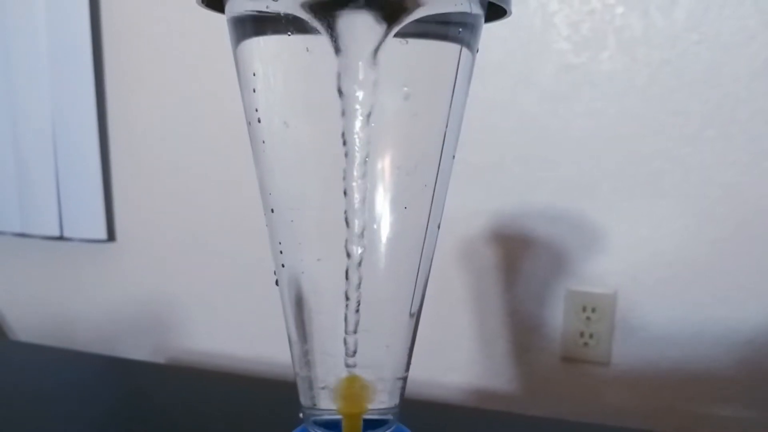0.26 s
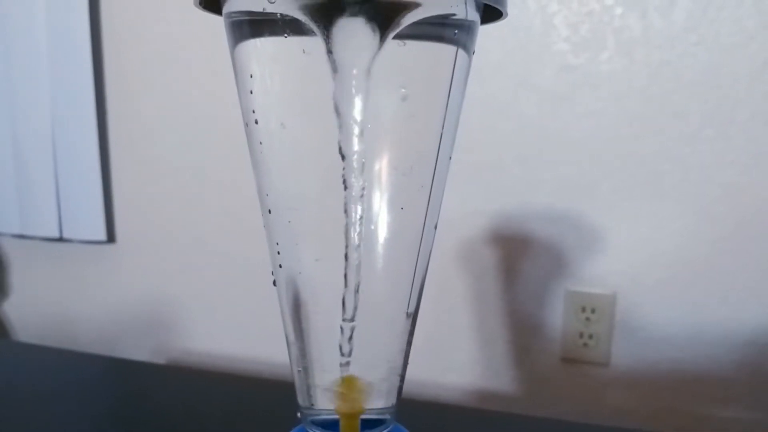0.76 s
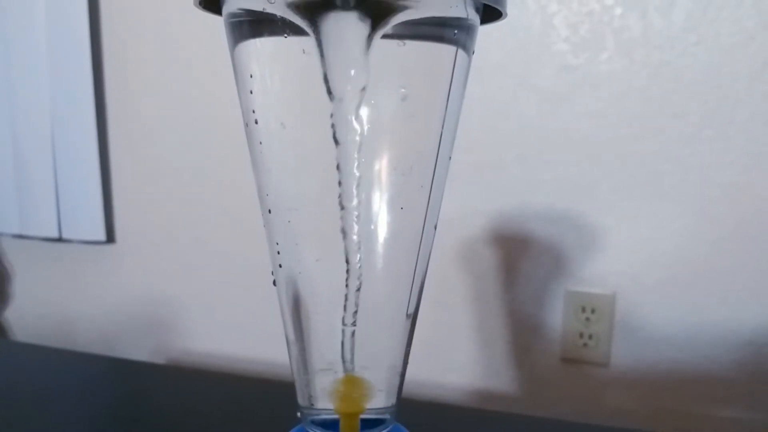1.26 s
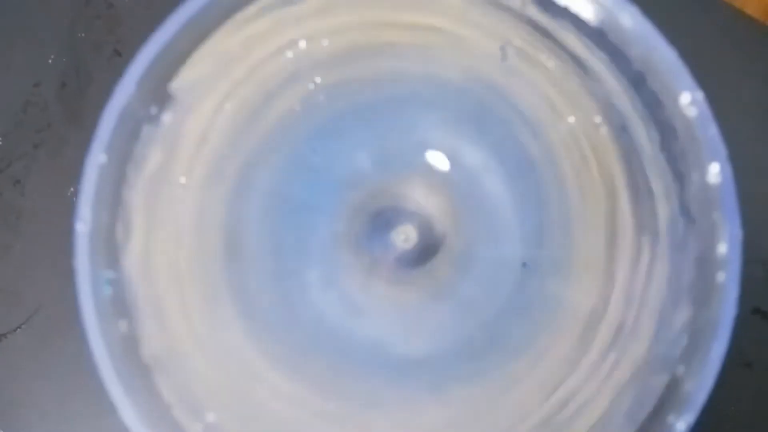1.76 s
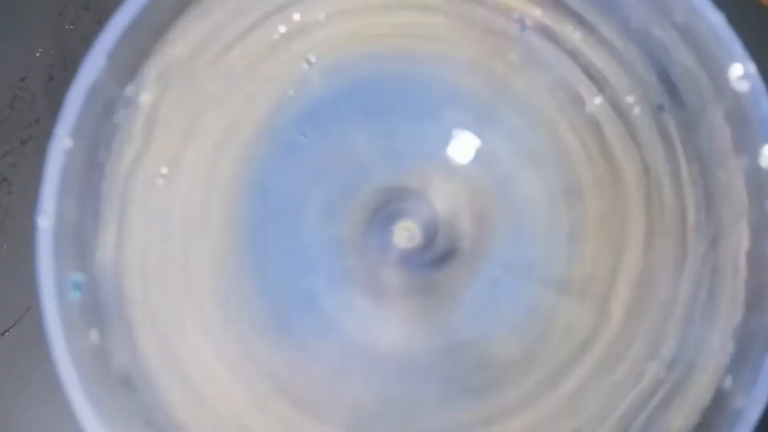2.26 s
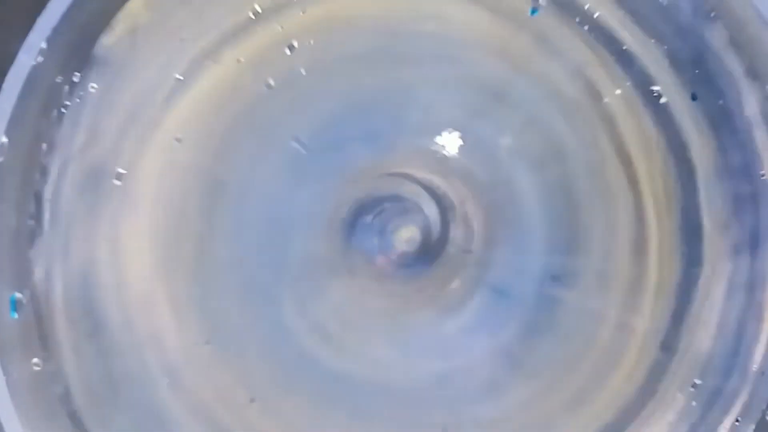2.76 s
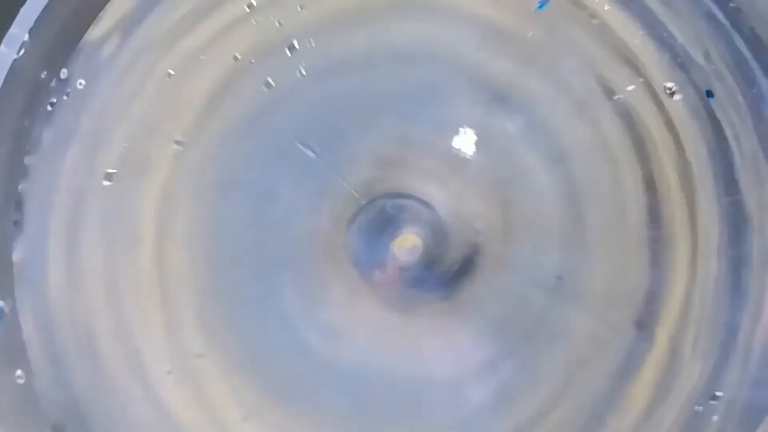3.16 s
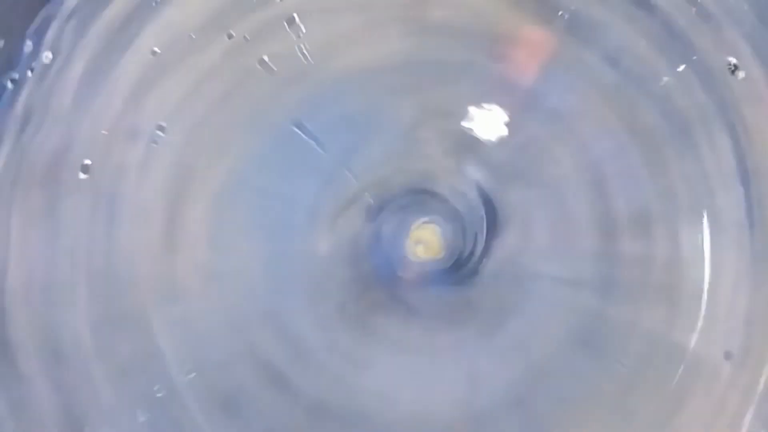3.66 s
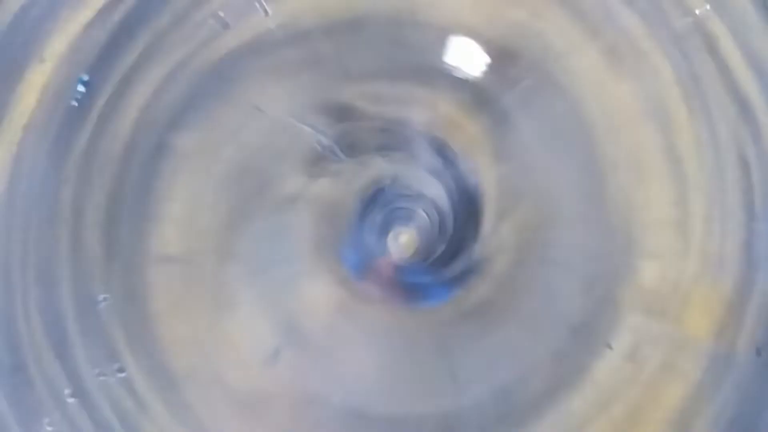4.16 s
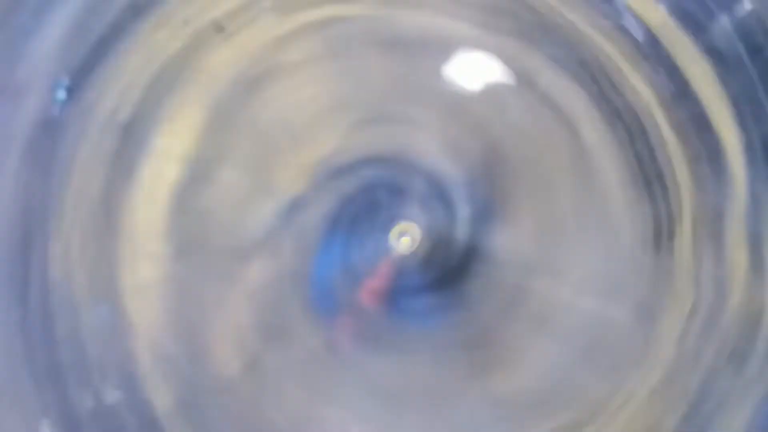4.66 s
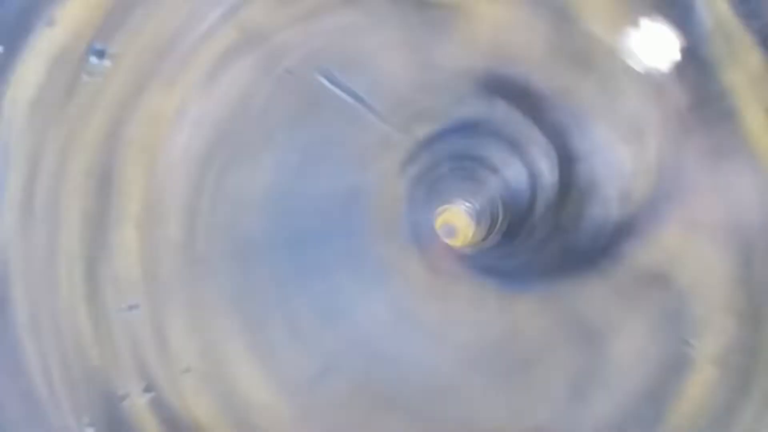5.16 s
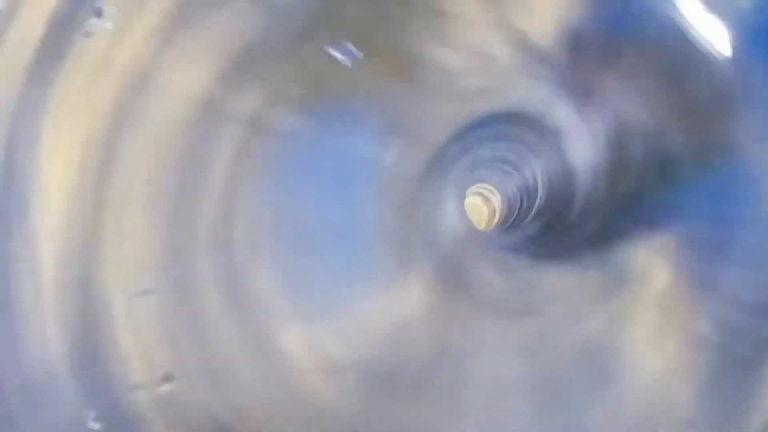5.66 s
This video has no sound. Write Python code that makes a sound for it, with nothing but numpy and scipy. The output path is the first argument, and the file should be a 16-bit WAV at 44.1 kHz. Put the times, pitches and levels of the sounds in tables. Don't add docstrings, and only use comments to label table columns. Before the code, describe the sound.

A motor-stirred vortex hisses and bubbles, muffled from the side, then abruptly close and crackly from above, ending in wet pops and glugs.

```python
import sys
import numpy as np
from scipy import signal
from scipy.fft import rfft, irfft
from scipy.io import wavfile
from scipy.ndimage import uniform_filter1d

SR = 44100
rng = np.random.default_rng(int(sys.argv[2]) if len(sys.argv) > 2 else 0)


def voltage_ratio(decibels):
    exponent = np.asarray(decibels, float) / 20
    return 10 ** exponent


def store_pcm(level_fs):
    pcm = np.round(np.clip(level_fs, -1, 1) * 32767).astype(np.int16)
    wavfile.write(sys.argv[1], SR, np.atleast_2d(pcm).T)


N = 261072
TIME = np.arange(N) / SR
SHAFT_HZ = 44.3


def unit(x):
    return x / np.sqrt(np.mean(x ** 2) + 1e-30)


def band(x, lo_hz, hi_hz, order=4):
    return signal.sosfilt(signal.butter(order, [lo_hz, min(hi_hz, .45 * SR)], "band", fs=SR, output="sos"), x)


def ring(x, hz, width_hz):
    return signal.lfilter(*signal.iirpeak(hz, hz / width_hz, SR), x)


def walk(rate):
    k = int(SR / rate)
    held = np.repeat(rng.standard_normal(N // k + 1), k)
    return 1.91 * uniform_filter1d(uniform_filter1d(held, k), k)[:N]


def stir():
    # time in seconds, churn in dB, froth in dB.
    stirring = [(0.19, -1.5, 0.5), (0.27, 3, 3), (0.438, 2.5, 1.5), (0.6, -0.5, -2), (1.36, 1.5, -4),
                (1.43, 4, -5), (1.75, 1.5, -4.5), (2.02, -3, 8.5), (2.21, -1, 5), (2.58, -3.5, 5.5),
                (3.3, 0, -1.5), (3.44, 2.5, 2), (3.75, -1.5, 0), (4.42, -0.5, -4), (4.57, -0.5, 5),
                (4.98, -1.5, -7), (5.78, 3.5, -3.5), (5.92, 5, 8)]
    s, churn_db, froth_db = np.transpose(stirring)
    return np.interp(TIME, s, churn_db), np.interp(TIME, s, froth_db)


def room():
    # frequency in Hz, level in dB per Hz.
    spectrum = [(15, -49), (25, -12), (82, 0.5), (129, 3.5), (176, 3.5), (216, -10), (285, -7), (615, -30),
                (743, -17), (945, 1.5), (1310, -27), (1500, 6.5), (1950, -18), (3300, -120)]
    hz, db = np.transpose(spectrum)
    freqs = np.maximum(np.arange(N // 2 + 1) * SR / N, 1)
    shape = voltage_ratio(np.interp(np.log(freqs), np.log(hz), db))
    rumble = irfft(rfft(rng.standard_normal(N)) * shape, N)
    slosh = band(rng.standard_normal(N), 243, 770, order=2) * voltage_ratio(1.3 * walk(20.0))
    churn_db, froth_db = stir()
    slosh_db = -77.5 + 2.1 * churn_db + 0.43 * froth_db
    return voltage_ratio(-66.5 + 2.2 * walk(4.97)) * unit(rumble) + voltage_ratio(slosh_db) * unit(slosh)


def motor():
    # time in seconds, level of the fifth order in dB.
    load = [(0.0, -82.5), (1.71, -73.5), (1.76, -78), (2.31, -64), (2.47, -77.5), (2.59, -63), (2.8, -72.5),
            (3.38, -59.5), (4.04, -72), (4.12, -59), (4.47, -85.5), (4.53, -68.5), (5.06, -74), (5.14, -66),
            (5.23, -75), (5.89, -59), (5.92, -76)]
    # multiple of the shaft speed, level in dB.
    orders = [(3, -74), (4, -88), (7.5, -86), (8, -91)]
    turn = 2 * np.pi * np.cumsum(SHAFT_HZ * (1 + 0.0054 * walk(12))) / SR
    hum = sum(voltage_ratio(db + 2.0 * walk(4.89)) * np.sin(k * turn) for k, db in orders)
    fifth = np.sin(5 * turn)
    hollow = voltage_ratio(-1.0) * unit(ring(rng.standard_normal(N), 211.3, 18.0))
    load_db = np.interp(TIME, *np.transpose(load))
    return np.sqrt(2) * hum + voltage_ratio(load_db + 1.0) * (np.sqrt(2) * fifth + hollow)


def bumps():
    # start in seconds, peak in dB, frequency in Hz, width in Hz.
    pushes = [
        (2.985, -55.5, 447, 14),
        (4.015, -39, 500, 690),
        (4.3589, -35, 1720, 56),
        (4.636, -41, 497, 740),
        (5.6, -26, 2300, 60),
        (5.6895, -37, 2050, 200),
    ]
    out = 0
    for s, db, hz, width_hz in pushes:
        rung = ring(1. * (np.arange(N) == int(s * SR)), hz, width_hz)
        out = out + voltage_ratio(db) * rung / rung.max()
    return out


def swells():
    # middle in seconds, half length in seconds, level in dB, low edge in Hz, high edge in Hz.
    slops = [(0.21, .08, -63, 420, 1500), (.41, .14, -59.5, 500, 4100), (0.35, 0.14, -58.5, 7300, 15000),
             (1.5, .24, -75, 10000, 19000), (1.1, 0.074, -67, 560, 3900), (1.47, 0.13, -52.5, 1280, 4000),
             (1.69, .05, -59, 610, 1100), (3.38, .2, -68.5, 640, 1140), (2.15, .12, -69, 350, 1200),
             (5.15, 0.066, -89, 280, 860), (5.3, 0.11, -68, 370, 970), (5.65, 0.38, -69, 11400, 12000),
             (3.29, 0.081, -48.5, 980, 1350)]
    out = np.zeros(N)
    lumps = voltage_ratio(1.45 * walk(40))
    for s, half_s, db, lo_hz, hi_hz in slops:
        near = np.abs(TIME - s) < half_s
        rush = unit(band(rng.standard_normal(size=SR), lo_hz, hi_hz, order=2))[:near.sum()]
        out[near] += voltage_ratio(db) * rush * np.cos(np.pi / 2 * (TIME[near] - s) / half_s)
    return out * lumps


def core():
    # time in seconds, level in dB.
    whistle = [(0, -67.5), (3.3, -68), (3.6, -68), (3.9, -59), (4.3, -60), (4.7, -63), (5.1, -63),
               (5.4, -66.5), (5.92, -61)]
    air = sum(ring(ring(rng.standard_normal(N), hz, 240), hz, 240) for hz in (7300, 7560))
    return voltage_ratio(np.interp(TIME, *np.transpose(whistle)) + 1.0 * walk(10)) * unit(air)


def glugs():
    # start in seconds, length in seconds, peak in dB, first pitch in Hz, last pitch in Hz.
    singing = [
        (5.018, 0.038, -37, 2020, 2300),
        (5.118, 0.014, -49, 3450, 3400),
        (5.392, 0.017, -38, 2380, 2290),
        (6.4, 0.014, -25, 1720, 1790),
    ]
    out = 0
    for s, length_s, db, from_hz, to_hz in singing:
        age = np.clip((TIME - s) / length_s, 0, 1)
        mean_hz = from_hz + (to_hz - from_hz) * age / 2
        out = out + voltage_ratio(db) * np.sin(np.pi * age) * np.sin(2 * np.pi * length_s * age * mean_hz)
    return out * voltage_ratio(3 * walk(250))


def bubbles(span, modes, level_db):
    chance = rng.random((int(260 * (span[1] - span[0])), 5)).T
    mode = np.array([m for m in modes if m[0] < 7000])
    mode = mode[(chance[0] * len(mode)).astype(int)]
    start = ((span[0] + chance[1] * (span[1] - span[0])) * SR).astype(int)
    hz = mode[:, 0] * (1 + 0.22 * (chance[2] - .5))
    churn_db, _ = stir()
    db = level_db + .5 * mode[:, 2] - 4 * np.log(chance[3] + 0.0045) + 1.4 * churn_db[start]
    turns = hz[:, None] * np.arange(512) / SR
    life = turns / (8.2 * (0.27 + 0.74 * chance[4, :, None]))
    tone = np.exp(-3 * life) * np.sin(2 * np.pi * turns * (1 + 0.033 * life))
    out = np.zeros(N + 512)
    np.add.at(out, start[:, None] + np.arange(512), voltage_ratio(db)[:, None] * tone)
    return out[:N]


def strikes():
    blades = np.arange(0, N - 200, SR / (2 * SHAFT_HZ)).astype(int)
    return rng.integers(0, N, size=1500), blades + rng.integers(0, 60, size=len(blades))


def bursts(index, size, t60, crack=0.):
    start = np.zeros(N)
    np.add.at(start, index, size)
    fast, slow = (signal.lfilter([1], [1, -1000 ** (-1 / (t * SR))], start) for t in (t60, 5 * t60))
    noise = rng.uniform(-np.sqrt(3), np.sqrt(3), N)
    return crack * start + (fast + voltage_ratio(-21) * slow) * noise


def fizzing(pops, blades, shared):
    start = np.concatenate([pops, blades])
    size_db = 2.6 * shared + 3.6 * rng.exponential(size=len(start))
    ticks = bursts(start, voltage_ratio(np.minimum(size_db, 20)), t60=0.023, crack=6.1)
    return unit(rng.standard_normal(N) + voltage_ratio(0.5) * unit(ticks))


def pings(knocks):
    turns = knocks[:, 2:3] * np.arange(512) / SR
    tone = np.exp(-turns / 9.3) * np.sin(2 * np.pi * turns)
    out = np.zeros(N + 512)
    start = (knocks[:, :1] * SR).astype(int)
    np.add.at(out, start + np.arange(512), voltage_ratio(knocks[:, 1:2] - 9.5) * tone)
    return out[:N]


def cone(span, knocks, modes, zones, fizzes, crack):
    borders_hz = [2700, 5600, 9700]
    place = np.array([0, 1, 2, 2.92])
    home = np.searchsorted(borders_hz, knocks[:, 2])
    index = (knocks[:, 0] * SR).astype(int)
    spot = voltage_ratio(3.0 * rng.standard_normal(size=(len(knocks), 4, 8)))
    surge, out = walk(21.046), 0
    churn_db, froth_db = stir()
    pops, blades = strikes()
    shared = rng.exponential(size=len(pops) + len(blades))
    for zone, (lo_hz, hi_hz, plain_db, knock_db, t60) in enumerate(zones):
        level_db, per_churn, per_froth, drift = fizzes[zone]
        fizz_db = level_db + per_churn * churn_db + per_froth * froth_db + drift * (TIME - np.mean(span))
        unrest = 0.4 if zone == 3 else 1
        fizz_db = fizz_db + unrest * (1.13 * surge + 0.97 * walk(25))
        away = place[zone] - place[home]
        steps = np.where(away > 0, 2.66 * away, away)
        size = voltage_ratio(knocks[:, 1] - np.abs(knocks[:, 3] * steps) + knock_db)
        inside = [m for m in modes if np.searchsorted(borders_hz, m[0]) == zone] or [(11700, 7200, 0)]
        top_db = max(m[2] for m in inside)
        near = np.exp(-(np.log(knocks[:, 2:3] / np.array(inside)[:, 0]) / .08) ** 2)
        share = spot[:, zone, :len(inside)] * voltage_ratio(16.5 * near)
        if zone < 3:
            share = share / np.sqrt(np.mean(share ** 2, axis=1, keepdims=True))
        fizz = voltage_ratio(plain_db) * fizzing(pops, blades, shared)
        knock = voltage_ratio(plain_db - 6.0) * bursts(index, size, t60, crack=crack)
        probe = voltage_ratio(plain_db) * rng.standard_normal(N)
        for k, (hz, width_hz, db) in enumerate(inside):
            lift = voltage_ratio(db - top_db + 5.0)
            fizz = fizz + lift * voltage_ratio(1.8 * walk(24)) * ring(fizzing(pops, blades, shared), hz, width_hz)
            blow = bursts(index, size * share[:, k], t60, crack=6.93)
            knock = knock + lift * ring(blow, hz, 0.91 * width_hz)
            probe = probe + lift * ring(rng.standard_normal(N), hz, width_hz)
        knock = band(knock, lo_hz, hi_hz) / np.std(band(probe, lo_hz, hi_hz))
        out = out + voltage_ratio(fizz_db) * unit(band(fizz, lo_hz, hi_hz, order=6)) + 1.097 * knock
    return (out + pings(knocks)) * ((TIME >= span[0]) & (TIME < span[1]))


def water_from_side(span):
    # frequency in Hz, width in Hz, level in dB.
    wall_modes = [(836, 70, -7), (1595, 31, -4), (1950, 92, -1), (3350, 240, 3), (4170, 360, 4.5),
                  (5210, 390, 3), (6900, 800, -2), (8940, 86, -25)]
    # low Hz, high Hz, unresonant share in dB, knock in dB, knock t60 in s.
    zones = [(670, 2650, -8, -11.5, 0.029), (2830, 5980, -2.5, 2, 0.025), (5200, 9360, 6, 2, 0.016),
             (9150, 14200, -4, -21, 0.0048)]
    # level in dB, dB per churn dB, dB per froth dB, drift in dB per second.
    fizzes = [(-65, 1.5, 0.19, -1), (-54, 0.9, -0.24, -3), (-58.5, 0.6, 0.2, -0.5), (-70.5, 1, 0.8, 0.5)]
    # start in seconds, level in dB, favoured pitch in Hz, fall in dB per zone away from it.
    knocks = [(0.0054, -45, 5600, 0.5), (0.0134, -53, 5100, 11.5), (0.018, -55, 5340, 0),
              (0.0733, -53, 7140, 0), (0.0835, -48, 6200, 5), (0.129, -42.5, 3400, 1),
              (0.1387, -47, 1510, -1.5), (0.1762, -61, 6520, 10), (0.2527, -45, 4030, 8),
              (0.274, -47, 4150, 8), (0.3144, -35, 3340, 17), (0.3218, -39.5, 7160, 14),
              (0.373, -41.5, 7410, 10), (0.4671, -46, 3180, 7), (0.5122, -34, 8300, 10),
              (0.5183, -55, 6130, 6), (0.525, -62, 5240, 1), (0.5386, -57, 4130, 0),
              (0.564, -47.5, 4180, 7), (0.6732, -50, 5360, 12), (0.686, -47, 3300, 6),
              (0.7184, -43.5, 5140, 14), (0.731, -47.5, 5210, 4), (0.7798, -45, 7950, 0.5),
              (0.808, -42.5, 5350, 5), (0.822, -44, 3940, 3), (0.841, -44.5, 3450, -3),
              (0.8475, -45.5, 4020, -2), (0.9678, -48, 4500, 3.5), (1.0381, -46, 5570, 5),
              (1.1003, -46, 4840, 2), (1.139, -44.5, 4030, 4), (1.1524, -49, 4100, 1),
              (1.194, -46, 4660, 4), (1.2615, -61, 1870, 8), (1.303, -50, 4230, 15), (1.321, -48, 5040, 13),
              (1.3346, -60, 6360, 5), (1.3478, -45, 4070, 1.5), (1.3704, -55, 6590, -1),
              (1.405, -39.5, 1890, 2.5), (1.445, -51, 4220, 5), (1.4945, -44, 4450, 8),
              (1.5062, -42.5, 5240, 13), (1.561, -38.5, 3400, 16), (1.5717, -40, 4150, 15),
              (1.578, -40, 3150, 2), (1.676, -49, 5160, 1), (1.6917, -42, 2930, -1), (1.7, -47, 4120, 4)]
    water = cone(span, np.array(knocks), wall_modes, zones, fizzes, crack=0.86)
    return water + bubbles(span, wall_modes, level_db=-69.5)


def water_from_above(span):
    # frequency in Hz, width in Hz, level in
    # dB.
    cone_modes = [(1180, 112, 0), (1720, 88, 1), (2237, 145, 1), (3368, 224, 2.5), (4220, 256, 1),
                  (6020, 310, 0.5), (6640, 380, -1.5), (8230, 530, -5), (8990, 150, -7.5),
                  (2020, 30, 3), (3760, 150, -5), (4450, 72, -10), (11700, 250, -19), (13700, 500, -22.5)]
    modes = cone_modes
    # low Hz, high Hz, unresonant share in dB, knock in dB, knock t60 in s.
    zones = [(1022, 2390, -3.5, 1.06, 0.015), (2814, 5350, -2, -2, 0.029), (5200, 9530, -2, -4.5, 0.013),
             (9330, 16100, 11.5, -5.5, 0.016)]
    # level in dB, dB per churn dB, dB per froth dB, drift in dB per second.
    fizzes = [(-49.5, 0.97, 0.038, 0.33), (-52, 1.53, 0.029, -1.1), (-60.5, 0.76, 0.36, 0.57),
              (-65, 1.1, 0.66, 0.43)]
    # start in
    # seconds, level in dB, favoured pitch in Hz, fall in dB per zone away from it.
    knocks_above = [(1.7747, -29, 4580, 10), (1.7885, -32, 3020, 8), (1.7981, -50, 3230, 6),
                    (1.8551, -43, 1720, 3), (1.878, -30, 2980, 5.5), (1.8933, -42, 3140, 2.5),
                    (1.9032, -44, 3150, 6), (1.9117, -50, 3170, 1), (1.9639, -36, 5700, 11),
                    (2.0006, -40.5, 8740, 7), (2.0394, -41, 4150, 11), (2.0798, -39, 3220, 2),
                    (2.0844, -50, 6520, 10), (2.0951, -43, 2200, 7), (2.1012, -46, 4180, -1),
                    (2.1168, -35, 8400, 2), (2.1278, -29, 4400, 6), (2.1413, -35, 3060, 1.5),
                    (2.1582, -35.5, 2160, 5), (2.1658, -41, 4240, -4), (2.1733, -37, 1180, 1.5),
                    (2.1912, -36, 14070, 5), (2.2004, -38.5, 4150, 0.5), (2.2547, -34.5, 2120, 3),
                    (2.3088, -45, 5120, -0.5), (2.3333, -32.5, 4550, 13), (2.3697, -33, 8730, 20),
                    (2.391, -50, 8460, 9), (2.4175, -56, 2200, 6), (2.4371, -43, 9100, 6),
                    (2.4674, -50, 14650, 9), (2.5306, -42.5, 2220, 2), (2.5405, -37, 3610, 4),
                    (2.5575, -38.5, 4200, 3), (2.5694, -39, 5200, 3), (2.5798, -40, 1210, -1),
                    (2.5941, -39, 4100, -0.5), (2.6009, -39.5, 1900, 1), (2.7158, -44, 2170, 7),
                    (2.7701, -35.5, 1140, -1.5), (2.7802, -43, 4900, -1), (2.7889, -38, 2240, 2),
                    (2.8007, -34.5, 4480, 2), (2.8064, -34, 2860, 3.5), (2.8642, -44, 8940, 2),
                    (2.8861, -34, 4370, 6), (2.8939, -49, 3760, 5), (2.9249, -42, 3190, 4),
                    (2.9516, -34, 3160, 7), (2.9634, -22, 3760, 9),
                    (2.978, -21.5, 4350, 12), (2.9898, -36, 3100, 1.5), (3.1037, -49, 4610, 10),
                     (3.1363, -38.5, 3260, 9), (3.1677, -35.5, 1970, 12), (3.2147, -48, 3470, 2),
                     (3.2199, -33.5, 3360, 4), (3.2278, -36, 3500, 6), (3.2477, -41, 2200, 1),
                     (3.2668, -46, 6300, 0.5), (3.2824, -33.5, 3240, -1.5), (3.293, -48, 8290, 16),
                     (3.3035, -29, 3280, 1.5), (3.368, -37.5, 1190, 1), (3.38, -40, 1170, 0),
                     (3.4043, -39, 4430, 7), (3.4155, -30.5, 3540, 3.5), (3.4296, -34.5, 3540, 1),
                     (3.4384, -38, 3450, 0), (3.4455, -28, 3550, 11), (3.4527, -36, 3480, -1),
                     (3.461, -37, 3470, 0.5), (3.4721, -32, 3430, 5), (3.4836, -35, 3440, 2),
                     (3.5154, -36.5, 3350, 4.5), (3.6058, -53, 4170, 5), (3.615, -37.5, 8530, 3),
                     (3.6259, -36, 3460, 4), (3.659, -43.5, 1220, 2), (3.686, -46, 3490, 7),
                     (3.7114, -42.5, 2030, 1), (3.763, -38, 4570, 16), (3.7873, -47, 3600, 13),
                     (3.9199, -37, 3630, 5), (3.9488, -45, 4030, 1), (3.9552, -32, 4220, 17),
                     (3.9787, -39.5, 3500, 0.5), (4.0006, -41.5, 2050, 0.5), (4.013, -38, 2080, 2),
                     (4.065, -36, 1590, 1.5), (4.105, -36, 5740, 12), (4.1104, -32.5, 1180, 1),
                     (4.1223, -38, 1740, 0.5), (4.1318, -36.5, 1210, 3), (4.1473, -35.5, 1150, 1),
                     (4.184, -44, 6140, -2), (4.3548, -32, 1890, 3), (4.3846, -35, 2030, 2),
                     (4.41, -44.5, 1720, 0), (4.482, -35.5, 6940, 23),
                    (4.4995, -47, 1700, 6), (4.5351, -36, 1950, 2.5), (4.5951, -37.5, 1760, 2.5),
                    (4.6183, -43, 7080, -1), (4.6334, -34, 1190, 5), (4.6656, -42, 1130, 5),
                    (4.7206, -60, 4100, -3), (4.749, -44, 8200, 8), (4.784, -44.5, 3400, 1),
                    (4.8139, -43, 2020, 1), (4.951, -43, 1700, -2), (4.9808, -38, 1740, 2.5),
                    (5.0052, -33, 3400, 5.5), (5.037, -41.5, 2250, 1.5), (5.0704, -26.5, 2390, 16),
                    (5.0849, -34, 2400, 7), (5.222, -39.5, 3430, 3), (5.248, -39.5, 3500, 5),
                    (5.2594, -39.5, 3300, 4), (5.27, -40, 1720, 2), (5.283, -40.5, 1630, 0),
                    (5.292, -49, 1600, 1), (5.36, -45, 1740, 1), (5.3767, -35.5, 1660, 1),
                    (5.3962, -46, 2230, 1), (5.409, -35.5, 1730, 1), (5.4172, -46, 1710, -7),
                    (5.465, -31, 3280, 2.5), (5.5024, -48, 2300, 7), (5.5491, -24.5, 4220, 3.5),
                    (5.561, -35, 6020, 6), (5.5856, -33, 1720, 2.5), (5.5987, -33.5, 1950, 1),
                    (5.6298, -39, 1570, -1), (5.6346, -35.5, 1700, 1), (5.6525, -39, 1680, 1.5),
                    (5.675, -30.5, 1870, 2.5), (5.6875, -35, 2200, -6), (5.699, -34, 1760, 3),
                    (5.7121, -38, 3300, 1), (5.7452, -38, 2280, 5), (5.796, -43, 3370, 1),
                    (5.8074, -47, 6010, 5), (5.8198, -26.5, 3170, 1.5), (5.8301, -32.5, 2020, 0),
                    (5.845, -23.5, 1800, 6), (5.8534, -32.5, 1980, 1), (5.8642, -38, 2090, -2),
                    (5.9008, -34, 1720, 6), (5.909, -52, 8990, 6)]
    # start in seconds, level in dB, pitch in Hz.
    rim_drops = [(2.1172, -35, 8100), (2.2024, -32, 14000), (2.5794, -41, 6540), (2.78, -33, 5970),
                 (3.2136, -50, 5860), (3.267, -19, 9100), (3.2709, -23.5, 3300), (3.2926, -24, 8850),
                 (3.3798, -41, 7140), (3.483, -42, 6050), (3.6047, -32, 9210), (3.661, -44, 6050),
                 (3.687, -47, 6580), (4.148, -30, 7560), (4.4812, -36, 6350), (4.6343, -33, 7450),
                 (5.3794, -52, 6800), (5.4264, -33, 8400), (5.5612, -28, 6040), (5.6875, -18.5, 8640),
                 (5.745, -31, 6810), (5.7947, -31, 8160), (5.8067, -41, 6140), (5.8645, -37, 6010),
                 (5.9, -31, 6800), (5.9114, -25, 8970)]
    specks = [(3.4385, -37, 13500), (3.484, -36, 13500), (3.687, -47, 13900), (4.3874, -57, 12300),
              (4.4757, -51, 12400), (4.5351, -49, 12800), (4.5511, -44, 15400), (4.578, -39, 14900),
              (4.6179, -43, 13300), (4.6713, -47, 12000), (4.7197, -47, 12100), (5.2754, -50, 11500),
              (5.3787, -48, 11300), (5.5023, -49, 11500), (5.5977, -57, 13400), (5.7503, -41, 12900),
              (5.8072, -37, 11700), (5.8192, -35, 13300), (5.8192, -28, 11700)]
    drops = [(s, db - 10.5, hz, 9) for s, db, hz in rim_drops]
    drops = drops + [(s, db - 3.5, hz, 8) for s, db, hz in specks]
    knocks = np.vstack([knocks_above, drops])
    water = cone(span, knocks, modes, zones, fizzes, crack=6.65)
    return water + bubbles(span, modes, level_db=-61.0)


def two_ports(mid):
    far, late = np.roll(mid, N // 3), np.roll(mid, 37)
    side = voltage_ratio(-14.5) * band(mid, 1450, 2430, order=2)
    side = side - voltage_ratio(-15.0) * band(mid, 9130, 10800, order=2)
    side = side + voltage_ratio(-24.0) * band(mid, 3700, 10300)
    side = side + voltage_ratio(-17) * band(far, 20, 65, order=2)
    side = side + voltage_ratio(-33.5) * band(late, 280, 1160, order=2)
    side = side + voltage_ratio(-16.0) * band(late, 11000, 14600, order=2)
    return np.array([mid + side, mid - side])


def scene():
    # start in seconds, end in seconds.
    views = [
        (0, 1.74),
        (1.74, 5.92),
    ]
    water = water_from_side(views[0]) + water_from_above(views[1])
    mid = water + core() + motor() + room() + bumps() + swells() + glugs()
    fade_s, fade_half_s, fade_db = 1.745, 0.021, -22
    mid = mid * voltage_ratio(fade_db * np.clip(1 - np.abs(TIME - fade_s) / fade_half_s, 0, 1))
    return two_ports(mid)


def top_cut(x):
    return signal.sosfilt(signal.butter(12, 16500, fs=SR, output="sos"), x)


def record(dry):
    low_pass = signal.ellip(10, .2, 60, 15750, fs=SR, output="sos")
    mix = signal.sosfilt(low_pass, dry)
    return top_cut(mix)


dry = scene()
out = record(dry)
store_pcm(out)
```